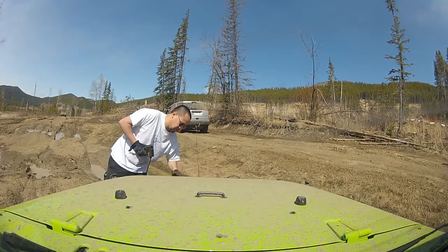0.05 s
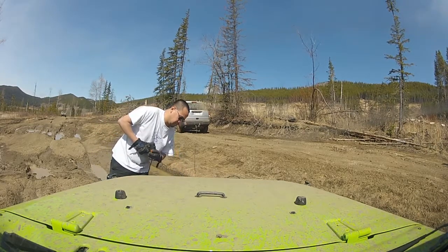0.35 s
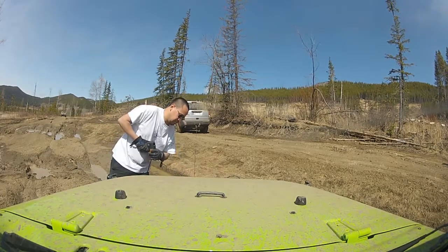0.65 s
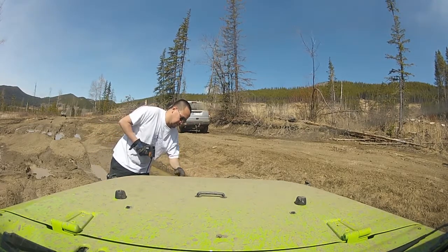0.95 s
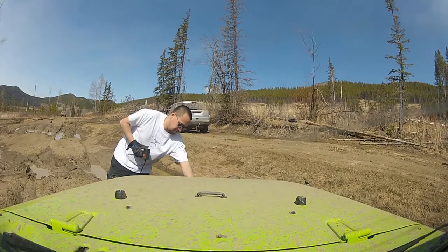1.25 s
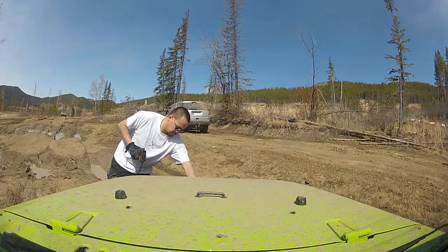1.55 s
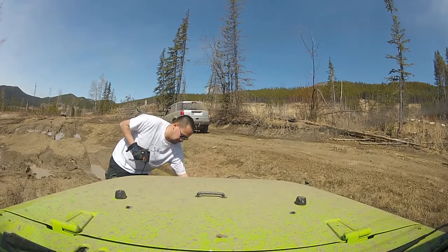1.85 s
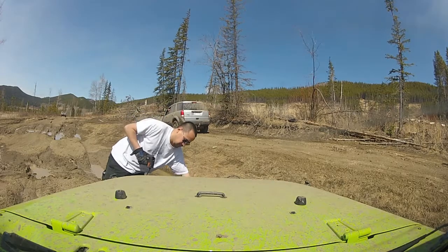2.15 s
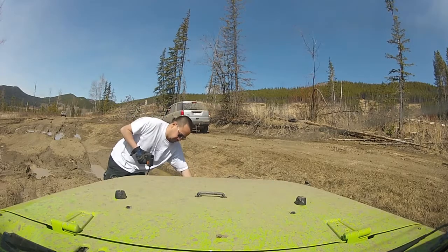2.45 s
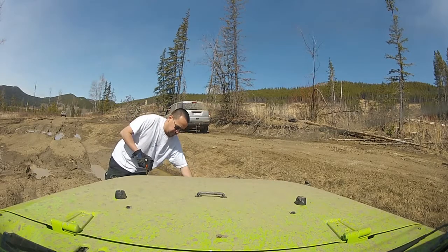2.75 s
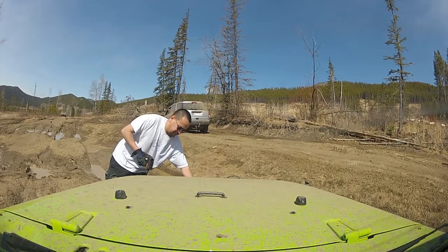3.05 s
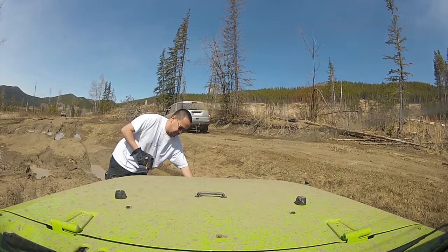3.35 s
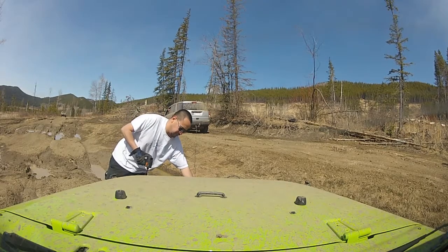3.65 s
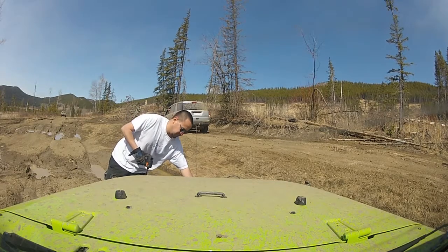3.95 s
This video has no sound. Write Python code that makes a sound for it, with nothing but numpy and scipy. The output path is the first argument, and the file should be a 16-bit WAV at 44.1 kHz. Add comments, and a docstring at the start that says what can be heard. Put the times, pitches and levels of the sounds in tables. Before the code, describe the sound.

An off-road vehicle's engine idles with a deep, uneven rumble, heard close from the bonnet outdoors. After a dull clunk at 0.2 seconds it labours for about a second, settling by 2 seconds. A faint knock follows, then a clunk at 2.8 seconds starts the winch motor. It rises in pitch, whirring and grinding harder to the end, with small metallic cable ticks from about 3.4 seconds.

```python
"""A deep engine idle, heard from the bonnet of an off-road vehicle on open ground, labours and settles.
A contactor clunks and the winch motor spins up through the panel resonances, then whirs and grinds
as the cable takes load, with small ticks from cable and hook. The sound is stored at a low rate
and each sample is held, which mirrors it into a thin fizz in the treble."""
import sys
import numpy as np
from scipy import signal
from scipy.fft import rfft, irfft
from scipy.io import wavfile

SR = 44100
rng = np.random.default_rng(int(sys.argv[2]) if len(sys.argv) > 2 else 0)


def bounce(signal):
    """Save signal as a 16-bit WAV file at the path given by the first command-line argument."""
    frames = np.transpose(np.atleast_2d(signal))
    limited = np.clip(frames, -1, 1)
    pcm = np.round(limited * 32767).astype(np.int16)
    wavfile.write(sys.argv[1], SR, pcm)


N = 176400


def undb(db):
    """Decibels to gain."""
    return 10 ** (np.asarray(db) / 20)


def unit(x):
    """Scale to rms 1."""
    return x / np.sqrt(np.mean(x ** 2))


def curve(rows):
    """Join (seconds, value) rows by straight lines."""
    return np.interp(np.arange(N) / SR, *np.array(rows).T)


def ramp(start_s, rise_s):
    """Rise from 0 to 1 and stay there."""
    return np.clip((np.arange(N) / SR - start_s) / rise_s, 0, 1)


def blow(start_s, attack_s, decay_s):
    """Envelope of a hit: quick rise, exponential fall."""
    falling_s = np.maximum(np.arange(N) / SR - start_s - attack_s, 0)
    return ramp(start_s, attack_s) * np.exp(-falling_s / decay_s)


def walk(rate_hz):
    """Smooth random drift, mostly slower than rate_hz; rms 1."""
    hz = np.arange(N // 2 + 1) * SR / N
    return unit(irfft(rfft(rng.standard_normal(N)) * np.exp(-(hz / rate_hz) ** 2), N))


def phase(hz):
    """Running angle in radians of a gliding frequency."""
    return 2 * np.pi * np.cumsum(hz) / SR


def colour(x, points):
    """Equalise through (Hz, dB) points, with steep skirts beyond them; rms 1."""
    hz = np.maximum(np.arange(N // 2 + 1) * SR / N, 1)
    point_hz, db = np.array(points).T
    skirts = 1 / np.sqrt((1 + (point_hz[0] / 2 / hz) ** 8) * (1 + (hz / point_hz[-1] / 2) ** 8))
    gain = undb(np.interp(np.log(hz), np.log(point_hz), db))
    return unit(irfft(rfft(x) * skirts * gain, N))


def noise_band(hz, width_hz):
    """Noise passed twice through a resonance of the given width; rms 1."""
    b, a = signal.iirpeak(hz, hz / width_hz, fs=SR)
    return unit(signal.lfilter(b, a, signal.lfilter(b, a, rng.standard_normal(N))))


def housing():
    """Narrow resonances of a metal housing, kept ringing by vibration."""
    # Each row: frequency in Hz, width in Hz, relative level in dB.
    modes = [(862, 22, 2.5), (1679, 47, -13), (2090, 53, -2), (2284, 81, -4.5), (2834, 39, -6.5)]
    return unit(sum(undb(db) * noise_band(hz, width_hz) for hz, width_hz, db in modes))


def bodywork(drone_hz=57.03, wander=0.034):
    """The engine sets a panel droning and shakes the body irregularly."""
    # Swells of the drone. Each row: time in seconds, level in dB.
    drone_db = [(0, -50), (.2, -52.5), (.4, -37.5), (.6, -47.5), (1.1, -47.5), (1.35, -41.5), (1.6, -46.5),
                (1.9, -59.5), (2.8, -54), (3.05, -30), (3.3, -39.5), (3.6, -49)]
    angle = phase(drone_hz * (1 + wander * walk(5.9)))
    drone = np.sqrt(2) * np.sin(angle) * undb(curve(drone_db))
    shake = undb(-47.5) * noise_band(32.1, width_hz=39)
    return drone + shake


def engine_bay(load):
    """Fan and valves rush steadily; under load the intake and fan roar and the housing rings."""
    # Tone of the steady rush and of the roar. Each row: frequency in Hz, relative level in dB.
    rush_eq = [(53, -27), (90, -1.5), (114, -3.5), (140, -9), (216, -6), (253, -7), (287, -10), (315, -9.5),
               (376, -11), (508, -13.5), (533, -19), (586, -8.5), (655, -17.5), (755, -13.5), (943, -27.5),
               (1320, -34), (1720, -28.5), (3470, -38), (4000, -46.5), (5200, -89), (8800, -120)]
    roar_eq = [(59, -31), (100, 2.5), (188, -9.5), (227, -9), (277, -15), (328, -15), (401, -14),
               (454, -42.5), (490, -19.5), (538, -22), (599, -17.5), (657, -25.5), (791, -21.5),
               (937, -19.5), (1200, -44.5), (1320, -30), (1820, -45.5), (2090, -26.5), (2640, -57.5),
               (2890, -40.5), (4000, -38.5), (5200, -91), (8800, -120)]
    flicker = undb(0.34 * walk(30))
    rush = undb(-50) * colour(rng.standard_normal(N) * flicker, rush_eq)
    roar = undb(-47.5) * colour(rng.standard_normal(N) * flicker, roar_eq)
    return rush + load * (roar + undb(-69) * housing())


def exhaust(angle, load, lope_db=2.0, uneven_db=4):
    """A boom at the firing rate; unequal cylinders add partials spaced at half that rate."""
    # Swells of the boom. Each row: time in seconds, level in dB.
    boom_db = [(0, -37), (.28, -37.5), (.7, -28), (.88, -37), (1.03, -31), (1.3, -39.5), (1.55, -40.5),
               (1.78, -45), (2.1, -37.5), (2.6, -35.5), (2.9, -35), (3.28, -27.5), (3.55, -35.5),
               (3.7, -31), (4, -36)]
    # Tone of the pipe. Each row: frequency in Hz, relative level in dB.
    pipe_eq = [(60, -1), (82, 2), (100, -7.5), (135, 2.5), (190, -7.5), (260, -12.5), (325, -10),
               (410, -13), (480, -28), (800, -17), (1000, -31)]
    boom = np.sqrt(2) * np.sin(angle) * undb(curve(boom_db) + lope_db * walk(14))
    partials = 0
    for k in range(4, 60):
        partial = np.sin(k * angle / 2 + rng.uniform(0, 2 * np.pi))
        swell = np.interp(np.arange(N), np.linspace(0, N, 20), rng.standard_normal(20))
        partials += partial * undb(uneven_db * swell)
    return boom + colour(partials, pipe_eq) * undb(-57 + 14.5 * load)


def engine():
    """An uneven idle that labours for about a second, then settles."""
    # Engine speed. Each row: time in seconds, firings per second.
    firing_hz = [(0, 33.6), (.4, 32.3), (.78, 31.8), (.92, 30.7), (1.08, 34.9), (1.3, 31.8), (1.75, 34),
                 (2.0, 32.5), (2.8, 34.2), (3.1, 32.5), (3.35, 32.5), (3.6, 30.6), (4, 40)]
    # Engine effort. Each row: time in seconds, load from 0 to 1.
    effort = [(0, 0), (.15, 0), (.25, 0.66), (.45, 1.0), (.75, 1), (.9, 0.9), (1.07, 0.91), (1.35, 0.63),
              (1.6, 0.28), (1.95, 0.04), (2.8, 0), (4, 0.18)]
    load = curve(effort)
    return bodywork() + engine_bay(load) + exhaust(phase(curve(firing_hz)), load)


def ticks():
    """Short gritty ticks of metal on metal from cable, hook and contactor."""
    # Each row: start in seconds, level in dB.
    hits = [(0.164, -62), (.222, -76), (.728, -66), (1.038, -58.5), (2.80, -55), (2.815, -61), (3.41, -55),
            (3.49, -51.5), (3.615, -47.5), (3.735, -52), (3.765, -56), (3.805, -56), (3.835, -59),
            (3.903, -50.5), (3.915, -52)]
    # Tone of the metal. Each row: frequency in Hz, relative level in dB.
    tick_eq = [(400, -41), (850, 5.5), (1250, -7), (1700, 11), (2200, -10), (2800, 6), (3800, -10)]
    envelope = sum(undb(db) * blow(start, attack_s=0.011, decay_s=0.0055) for start, db in hits)
    return colour(rng.standard_normal(N), tick_eq) * envelope


def knocks():
    """Dull clunks on the vehicle's front, the last the contactor: metal rattles over a body thud."""
    # Each row: start in seconds, rattle level in dB, thud level in dB.
    hits = [(.197, -44, -68), (2.29, -55, -52.5), (2.817, -46.5, -34.5)]
    # Tone of the rattle. Each row: frequency in Hz, relative level in dB.
    rattle_eq = [(150, -3.5), (400, 12), (520, -16.5), (850, 12.5), (1200, -27), (2100, -16.5),
                 (3700, -23.5)]
    rattle = colour(rng.standard_normal(N), rattle_eq)
    thud = noise_band(140, width_hz=170)
    clunks = 0
    for start, rattle_db, thud_db in hits:
        envelope = blow(start, attack_s=0.0071, decay_s=0.026)
        clunks += envelope * (undb(rattle_db) * rattle + undb(thud_db) * thud)
    return clunks


def gear_train(angle, mesh_db=1.8, judder_db=2.5):
    """The gears grind harder once per motor turn, while the drum rumbles and the housing rings."""
    # Tone of the gears. Each row: frequency in Hz, relative level in dB.
    gear_eq = [(160, -40), (280, -19), (313, -1), (338, -12), (391, 5), (457, -24), (499, -4), (546, -7.5),
               (597, -8.5), (652, -9.5), (779, -5.5), (921, -7), (1060, -14), (1190, -36.5), (1680, -19.5),
               (1900, -26.5), (2070, -18), (2620, -30), (2860, -28.5), (3130, -28.5), (4000, -32),
               (5200, -61), (8800, -120)]
    # Fader for gears, drum and housing together. Each row: time in seconds, gain in dB.
    grind_db = [(2.84, -45), (2.95, -56), (3.06, -51.5), (3.17, -45), (3.3, -46.5), (3.45, -45),
                (3.62, -44.5), (3.8, -42), (4, -41.5)]
    meshing = undb(mesh_db * np.cos(angle) + judder_db * walk(43))
    gears = colour(rng.standard_normal(N) * meshing, gear_eq)
    drum = undb(3.5) * noise_band(142.6, width_hz=132)
    return (gears + drum + undb(-16.5) * housing()) * undb(curve(grind_db))


def motor_hum(speed_hz, angle, flutter_db=0.94, rough_db=3.5):
    """Motor harmonics swell as they cross panel resonances and grow brighter under load."""
    # Each row: multiple of the motor speed, base level running free in dB, base level loaded in dB.
    harmonics = [(1, -34, -36.5), (2, -43, -39.5), (3, -56, -45), (4, -65, -50.5), (5, -57.5, -57),
                 (6, -65.5, -60), (7, -68.5, -58.5), (8, -67, -65), (9, -73, -59), (10, -71, -61.5),
                 (12, -78, -69.5)]
    # Panel resonances. Each row: frequency in Hz, width in Hz, lift in dB.
    panels = [(60.4, 16.6, 13.5), (151.2, 17.5, 15.5), (390.5, 30, 18), (801.5, 44, 7.5)]
    load = ramp(3.27, rise_s=0.2)
    strain_db = 5 * ramp(3.606, rise_s=0.25)
    hum = 0
    for k, free_db, loaded_db in harmonics:
        level_db = free_db + (loaded_db - free_db) * load
        level_db += sum(db / (1 + (2 * (k * speed_hz - hz) / width) ** 4) for hz, width, db in panels)
        if k <= 2:  # the lowest two swell as the cable tightens
            level_db += strain_db + flutter_db * walk(13)
        else:
            level_db += rough_db * walk(13)
        hum += np.sqrt(2) * np.sin(k * angle + rng.uniform(0, 2 * np.pi)) * undb(level_db)
    return hum


def winch(wobble=0.0029):
    """The motor fades in as it spins up, driving the gears and the cable drum."""
    # Motor speed. Each row: time in seconds, turns per second.
    spin_up = [(2.84, 36), (2.93, 53.8), (2.962, 62.2), (3.0, 71), (3.102, 78), (3.254, 83.1), (3.49, 86.3),
               (3.75, 87.3), (4.0, 88.5)]
    speed_hz = curve(spin_up) * (1 + wobble * walk(13.4))
    angle = phase(speed_hz)
    return ramp(2.82, rise_s=0.17) * (motor_hum(speed_hz, angle) + gear_train(angle))


def scene():
    """All sources close by, in mono, with no walls to echo them."""
    return (engine() + ticks() + knocks() + winch())[None]


def record(dry, store_hz=8000, hold_count=6, top_hz=15400):
    """Low-rate samples held as steps mirror the sound into a treble fizz; then the top is cut."""
    stored = signal.resample_poly(dry, store_hz, SR, axis=1, window=("kaiser", 4))
    held = np.repeat(stored, hold_count, axis=1)
    steps = signal.resample_poly(held, SR, store_hz * hold_count, axis=1)[:, :N]
    return signal.sosfilt(signal.ellip(10, .1, 80, top_hz, fs=SR, output="sos"), steps)


dry = scene()
out = record(dry)
bounce(out)
```